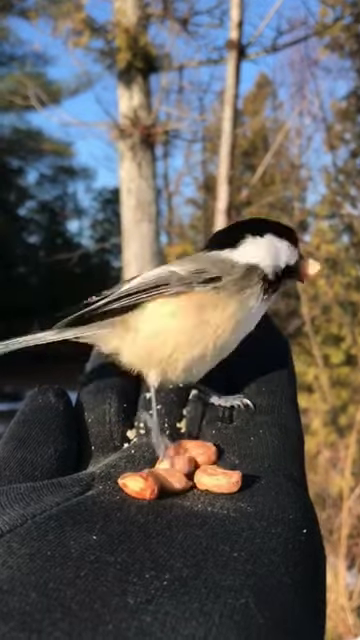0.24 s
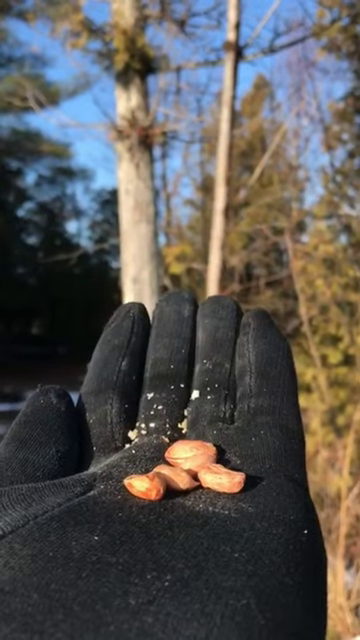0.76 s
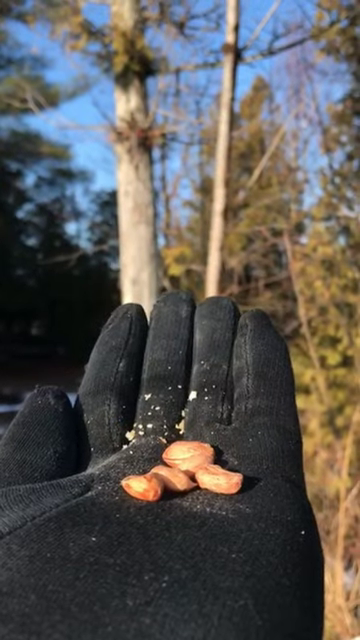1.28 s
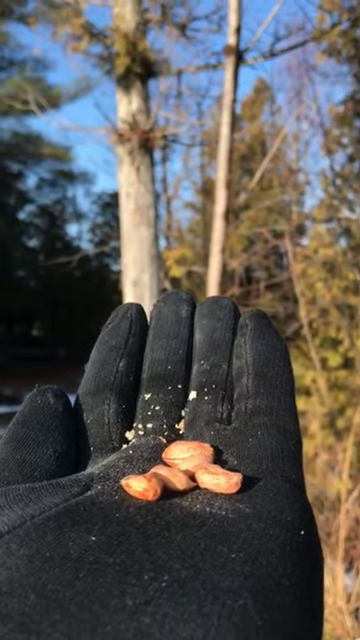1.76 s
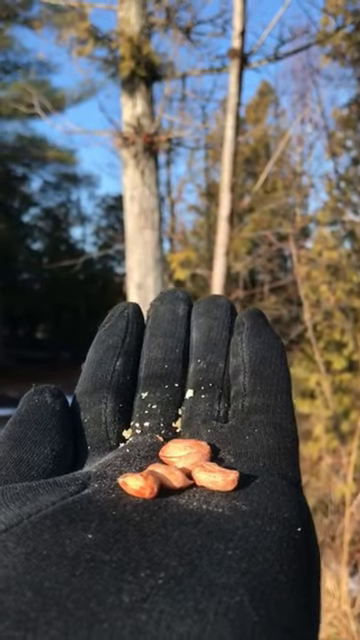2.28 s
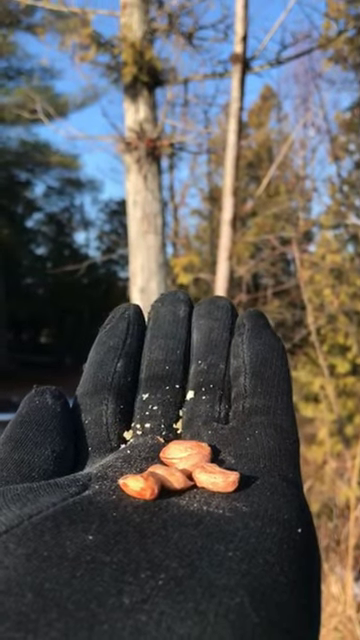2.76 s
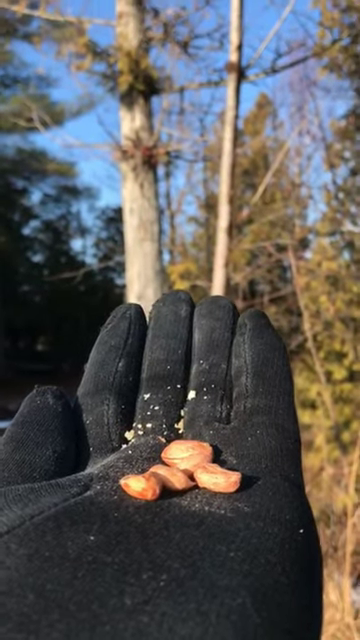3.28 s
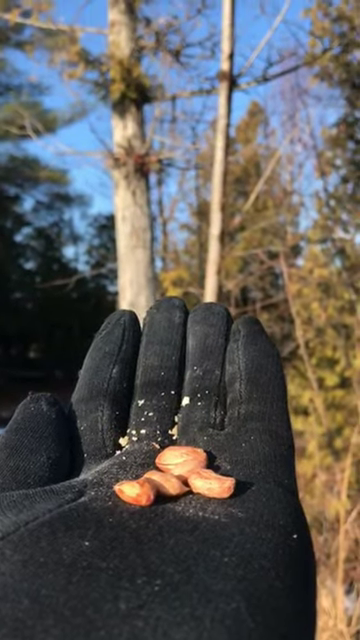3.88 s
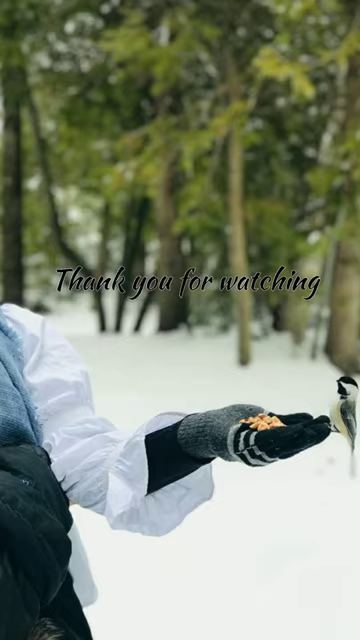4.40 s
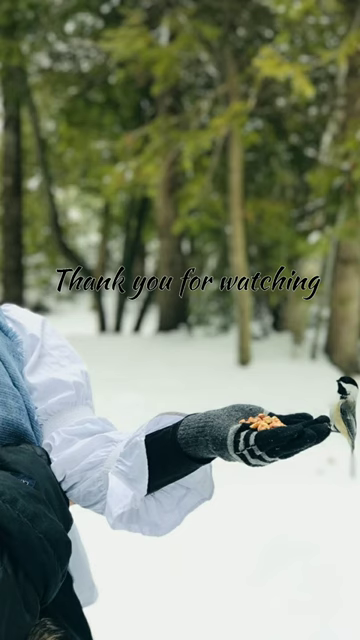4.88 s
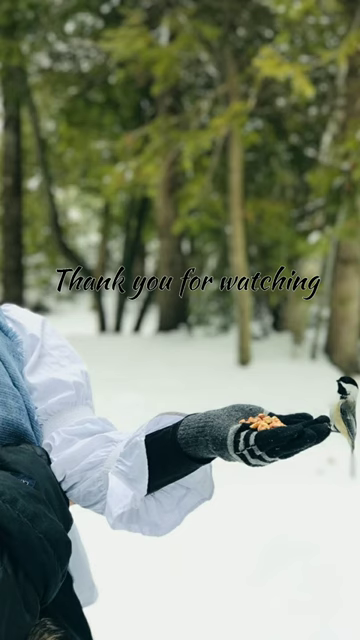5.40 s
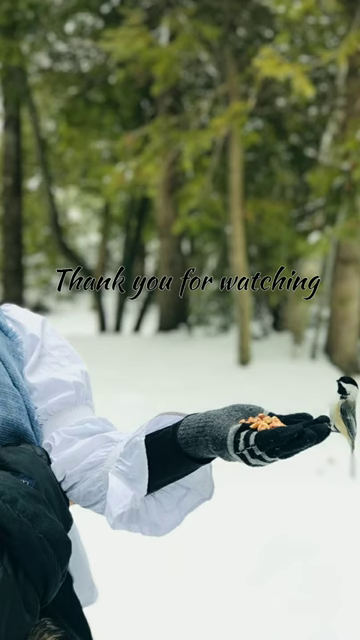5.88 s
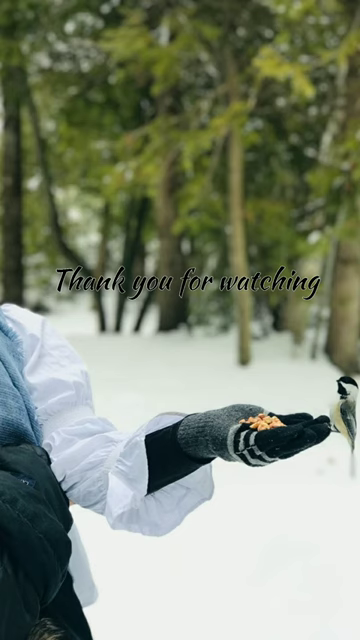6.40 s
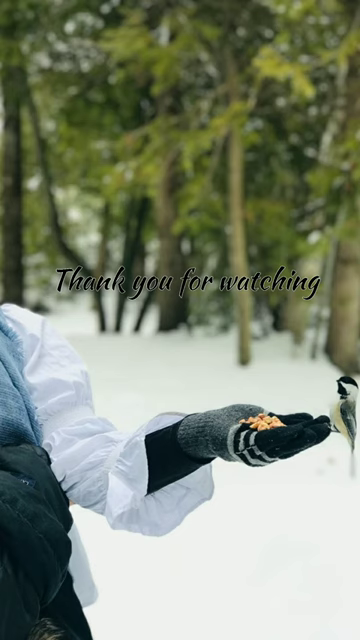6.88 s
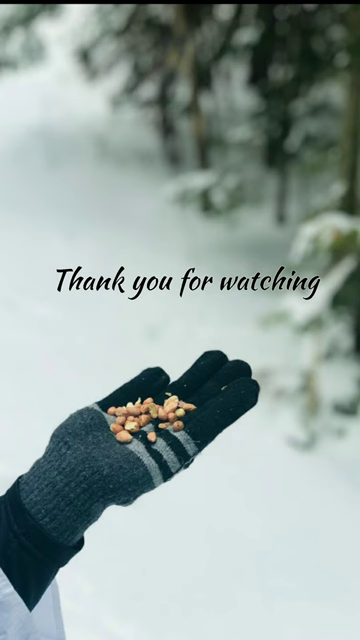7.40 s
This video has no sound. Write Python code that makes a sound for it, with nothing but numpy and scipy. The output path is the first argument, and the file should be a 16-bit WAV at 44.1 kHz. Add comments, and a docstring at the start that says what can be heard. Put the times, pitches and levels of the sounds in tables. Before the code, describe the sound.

From 0 s, low wind rumbles on a stereo microphone outdoors, over faint tree rustle, fine hiss and a distant flickering murmur of small birds. A tiny tap comes at 0.24 s. Around 0.5 s feathers flick and a small bird takes off close by: seven soft, rapid wing thumps, about 25 a second, with a dry whirr fading by 0.85 s. A tiny trill and chirp overlap it. A crisp high chip at 1.25 s, then a near warble at 1.7 s, slightly left. A wind thud and knock come at 2.0-2.1 s, while a soft repeated note runs to 2.55 s. Thin descending glides cluster at 3.1-3.5 s; a sharp click at 3.7 s. Hoarse chatter at 4.5 s, a clear chirp at 5.15 s. From 5.2 s wind buffets grow and rustling rises; hoarse calls at 6.2 s, a dull tap at 6.36 s, then chirps and a buzz until the end at about 7.6 s.

```python
"""Chickadee at a winter wood's edge

A chickadee takes a nut from a gloved hand and whirs away: its wings are air pulses and feather noise.
Small birds call all round in frequency-modulated tones: rising two-voiced chirps, thin gliding tones,
buzzes, a warble, a hooked chip and hoarse harmonic stacks, scattered by the trunks as decaying grains.
Shaped noise makes trees, far flock and wind, which freshens; a few light taps ring as decaying sines."""
import sys
import numpy as np
from scipy import signal
from scipy.fft import rfft, irfft, next_fast_len
from scipy.io import wavfile
from scipy.ndimage import uniform_filter1d, map_coordinates

SR = 44100
rng = np.random.default_rng(int(sys.argv[2]) if len(sys.argv) > 2 else 0)


def to_wav(sig):
    """Store sig (one row per channel, or 1-D mono) as 16-bit WAV at the path in sys.argv[1].

    Samples outside -1..1 are clipped; the rate is SR.
    """
    pcm = np.clip(np.atleast_2d(sig), -1, 1) * 32767
    pcm = np.round(pcm).astype(np.int16)
    wavfile.write(sys.argv[1], SR, pcm.T)  # frames by channels


N = 337365
T = np.arange(N) / SR

# Level columns and settings apply before envelopes, scatter and any gain named in the code.
# Spectrum tables give relative density; noise() scales the result to rms 1.


def undb(db):
    """Logarithmic level: 20 decibels are a factor of ten in amplitude."""
    return 10 ** (np.asarray(db) / 20)


def unit(x):
    """Mean-square normalisation: scale to rms 1."""
    return x / np.sqrt(np.mean(x ** 2) + 1e-20)


def add(out, start_s, x):
    """Superposition: sum x into out from start_s, cut at both ends of the scene."""
    i = int(round(start_s * SR))
    first, last = max(i, 0), min(i + x.shape[-1], N)
    out[..., first:last] += x[..., first - i:last - i]


def noise(spectrum, size=N):
    """Spectral shaping: white noise filtered to (frequency_hz, relative_density_db), rms 1."""
    hz, db = np.transpose(spectrum)
    n = next_fast_len(size)
    f = np.maximum(np.fft.rfftfreq(n, 1 / SR), 1)
    gain = undb(np.interp(np.log(f), np.log(hz), db))
    white = rng.standard_normal(n)
    return unit(irfft(rfft(white) * gain, n)[:size])


def wide(spectrum, side_db):
    """Partial coherence: common noise plus opposite-signed side noise at a given level."""
    middle = noise(spectrum)
    side = noise(spectrum) * np.array([[1], [-1]])
    return unit(middle + undb(side_db) * side)


def walk(rate_hz, size=N):
    """Slow random modulation: random values, rate_hz a second, joined by a smooth curve."""
    at = np.arange(size) / SR * rate_hz
    values = rng.standard_normal(int(at[-1]) + 2)
    return map_coordinates(values, [at], order=2, mode="nearest")


def progress(length_s):
    """Normalised time: 0 to 1 over a note."""
    return np.linspace(0, 1, max(int(length_s * SR), 16))


def swell(u, edge):
    """Amplitude envelope: sine onset and release, each a share of the note."""
    return np.sin(np.pi / 2 * np.clip(np.minimum(u, 1 - u) / edge, 0, 1))


def ports(pan_db):
    """Level-difference panning: left and right gains pan_db apart."""
    return undb(np.array([[pan_db], [-pan_db]]) / 2)


def wood(x, wet_db, t60, pan_db=0):
    """Multiple scattering: direct sound plus sparse decaying echoes from trunks, unlike at each port."""
    t = np.arange(int(.9 * SR)) / SR
    scatter = rng.standard_normal((2, len(t))) * (rng.random((2, len(t))) < .05)
    # builds up over milliseconds, then falls 60 dB in t60 seconds
    scatter = scatter * undb(-60 * t / t60) * (1 - np.exp(-t / 0.0087))
    scatter /= np.sqrt(np.sum(scatter ** 2, axis=1, keepdims=True))
    mono = np.atleast_2d(x).mean(axis=0, keepdims=True)
    echoes = signal.fftconvolve(mono, scatter, axes=1)[:, :N]
    return x * ports(pan_db) + undb(wet_db) * echoes


def syrinx(hz, waver, flicker_db):
    """Frequency and amplitude modulation: a near sine whose pitch and loudness tremble."""
    phase = 2 * np.pi * np.cumsum(hz * (1 + waver * walk(376.0, size=len(hz)))) / SR
    return unit(np.sin(phase) * undb(flicker_db * walk(137, size=len(hz))))


def slur(u, first_hz, middle_hz, last_hz):
    """Frequency glide: a parabola of pitch through three points."""
    return np.polyval(np.polyfit([0, .5, 1], [first_hz, middle_hz, last_hz], 2), u)


def thin_tone(hz, db):
    """Frequency-modulated tone: one trembling near sine along a pitch line."""
    u = np.linspace(0, 1, len(hz))
    return undb(db) * swell(u, edge=0.15) * syrinx(hz, waver=0.013, flicker_db=4.0)


def near_note(start_s, hz, db):
    """Frequency-modulated tone with crisp edges, from a bird close by."""
    out = np.zeros(N)
    u = np.linspace(0, 1, len(hz))
    add(out, start_s, undb(db) * swell(u, edge=.028) * syrinx(hz, waver=.016, flicker_db=2.5))
    return out


# air in the trees, rising as the breeze freshens: time_s, rustle_db, hiss_db
AIR_LEVELS = [(0, -62, -70), (4.5, -61, -69.5), (6.1, -56.5, -65), (7.65, -56.5, -63.9)]
# spectrum of the rush of the trees: frequency_hz, relative_density_db
TREE_SPECTRUM = [(120, 5), (250, 5), (400, 3), (700, 0), (1200, -5), (2200, -12), (3000, -16), (4200, -17),
                 (7000, -21), (12000, -44)]
# spectrum of the fine hiss: frequency_hz, relative_density_db
HISS_SPECTRUM = [(1000, -8), (3000, -7), (6500, 1.5), (8000, 4.5), (11000, 4.5), (15500, 2.5)]


def air():
    """Broadband turbulence noise: soft rush of the trees over a fine even hiss."""
    time_s, rustle_db, hiss_db = np.transpose(AIR_LEVELS)
    rustle = wide(TREE_SPECTRUM, side_db=-4) * undb(np.interp(T, time_s, rustle_db) + 5.0 + .5 * walk(9))
    hiss = wide(HISS_SPECTRUM, side_db=-14) * undb(np.interp(T, time_s, hiss_db) + 2.5)
    return rustle + hiss


# distant chatter of the flock: time_s, level_db
FLOCK_LEVELS = [(0, -71), (1.6, -78), (1.9, -65), (2.9, -79), (3.5, -65.5), (4.3, -74), (4.9, -68),
                (5.7, -73), (6.7, -66.5), (7.65, -70)]
# spectrum of the blurred calls: frequency_hz, relative_density_db
CHATTER_SPECTRUM = [(1500, -27), (1900, 2.5), (2200, 0), (2800, -5), (3500, -1), (4400, -4), (5200, -34)]


def flock():
    """Incoherent summation: many far calls blur into a flickering noise murmur."""
    level_db = np.interp(T, *np.transpose(FLOCK_LEVELS)) + 1.5 * walk(22)
    return wide(CHATTER_SPECTRUM, side_db=0) * undb(level_db)


# spectrum of the higher flutter of wind: frequency_hz, relative_density_db
SMALL_EDDY_SPECTRUM = [(10, -50), (70, -27), (110, 0.5), (160, 4.5), (200, -7), (330, -31), (1500, -90)]
SMALL_EDDY_DB, FRESH_DB, FRESH_S = -59, 10, 6.04  # calm level; step up as the breeze freshens; its time


def small_eddies():
    """Small-scale turbulence: a higher flutter at the ports that steps up as the breeze freshens."""
    fresh = T > FRESH_S
    return wide(SMALL_EDDY_SPECTRUM, side_db=0) * undb(SMALL_EDDY_DB + FRESH_DB * fresh + 2.0 * walk(12))


# wind on the microphone, calm with one lull, then freshening in gusts: time_s, level_db
GUST_LEVELS = [(0, -37.5), (.3, -40), (.4, -50.5), (.47, -41), (.95, -40.5), (1.1, -42.5), (2.0, -43),
               (2.6, -43.5), (3.1, -39.5), (3.5, -43), (5.18, -41.5), (5.26, -34.5), (5.6, -39),
               (5.84, -33), (5.92, -38.5), (6.45, -35), (7.1, -33.5), (7.65, -37.5)]
# spectrum of the wind rumble: frequency_hz, relative_density_db
RUMBLE_SPECTRUM = [(15, -6), (30, -10.5), (40, 0), (47, 3.5), (62, -6.5), (80, -4), (100, -9), (120, -17.5),
                   (155, -15), (200, -26.5), (300, -35.5), (600, -74), (3000, -87)]
# sudden low buffets: start_s, length_s, centre_hz, level_db, left_minus_right_db, left_port_lag_s
WIND_BUFFETS = [(0.635, 0.067, 47.2, -37.5, 1, 0), (1.984, .048, 76, -24, -5, .004),
                (2.03, .046, 78.5, -31, -4, .003), (2.062, .045, 84, -33, -2, .004),
                (2.095, .04, 125, -36, 2, .002), (3.976, 0.097, 52, -37, 2, 0),
                (5.231, .03, 72.4, -28, -4, .005), (5.53, .07, 43.5, -31, 3, .002),
                (5.792, .058, 55, -27, -2, .002), (6.32, 0.045, 112, -41.5, 4, 0),
                (7.027, .052, 75, -22.5, -4, .004), (7.472, .05, 68, -29, -2, .006)]
WIND_DB, EDDY_DB, EDDY_HZ = 1.53, 1.9, 9  # offset to the gusts; depth and rate of random surging


def wind():
    """Turbulent pressure at each port: gusts set the strength of eddies, and vortices throw low thuds."""
    eddies = wide(RUMBLE_SPECTRUM, side_db=-1.93)
    # dividing by the short-time rms leaves the gust curve to set the level
    strength = np.sqrt(uniform_filter1d(np.mean(eddies ** 2, axis=0), int(.1 * SR)))
    gust = undb(np.interp(T, *np.transpose(GUST_LEVELS)) + WIND_DB + EDDY_DB * walk(EDDY_HZ))
    out = ports(pan_db=1.75) * gust * eddies / strength
    for start_s, length_s, centre_hz, level_db, pan_db, lag_s in WIND_BUFFETS:
        u = progress(length_s)
        # a passing vortex swings the pressure unevenly; the left port may lag
        hz = centre_hz * (1 + 0.16 * walk(85.0, size=len(u)))
        swing = np.sin(2 * np.pi * np.cumsum(hz) / SR)
        left, right = undb(level_db) * ports(pan_db) * unit(swing * swell(u, edge=.5))
        add(out[0], start_s + lag_s, left)
        add(out[1], start_s, right)
    return out


# hoarse far calls: start_s, length_s, pitch_hz, throat_resonance_hz, level_db, roughness_share_of_pitch
HOARSE_CALLS = [(3.342, 0.18, 490, 2280, -69, .06), (4.457, 0.03, 630, 1900, -65, .02),
                (4.506, 0.035, 645, 2050, -63.5, .015), (4.54, 0.027, 535, 2250, -62, .03),
                (4.562, .059, 822, 2330, -56.5, .03), (4.617, .035, 650, 2000, -63, .03),
                (6.133, 0.032, 606, 1880, -58.5, .015), (6.172, .045, 695, 3450, -64, .015),
                (6.191, .03, 543, 2120, -56, .025), (6.226, .124, 490.5, 1990, -56.5, .06),
                (6.469, .037, 478, 2400, -70, .04), (6.847, .14, 454, 2350, -70, .04)]
RASP_PULSE_HZ = 32  # rounded to whole pulses in each call
RASP_ARCH, RASP_THROB_DB = .09, -4.5  # pitch (share) and level sink by these between pulses
THROAT_WIDTH_HZ, BEAK_HZ, BEAK_DB = 240, 3300, -16  # half-width of both resonances; weaker beak resonance


def resonance(hz, centre_hz):
    """Resonance curve: gain falls 3 dB at THROAT_WIDTH_HZ from the centre."""
    return 1 / np.hypot(1, (hz - centre_hz) / THROAT_WIDTH_HZ)


def hoarse_calls():
    """Source and filter: harmonics arch in even pulses, coloured by throat and beak resonances."""
    out = np.zeros(N)
    for start_s, length_s, pitch_hz, throat_hz, level_db, rough in HOARSE_CALLS:
        u = progress(length_s)
        pulses = max(round(length_s * RASP_PULSE_HZ), 1)
        dip = np.cos(np.pi * pulses * u) ** 2
        pitch = pitch_hz * (1 - RASP_ARCH * dip + rough * walk(260.4, size=len(u)))
        phase = 2 * np.pi * np.cumsum(pitch) / SR
        stack = np.zeros(len(u))
        # from the second harmonic up to about 3900 Hz
        for k in range(2, int(3900 / pitch_hz) + 1):
            colour = resonance(k * pitch, throat_hz) + undb(BEAK_DB) * resonance(k * pitch, BEAK_HZ)
            stack += np.sin(k * phase) * colour
        throb_db = RASP_THROB_DB * dip + 2.0 * walk(152, size=len(u))
        add(out, start_s, undb(level_db) * swell(u, edge=0.1) * unit(stack * undb(throb_db)))
    return out


# buzzy slurs: start_s, length_s, first_hz, middle_hz, last_hz, level_db, flutter_hz, flutter_depth_hz
BUZZ_NOTES = [(1.857, 0.11, 2300, 3270, 3560, -75, 27, 300), (4.545, .08, 6200, 6650, 6900, -69, 90, 500),
              (5.449, 0.15, 3810, 3590, 3500, -73, 70, 410),
              (7.385, .17, 4020, 3685, 3620, -60.5, 75.3, 300)]
BUZZ_THROB_DB = 4.5  # level swings this far up and down in each pulse


def buzzes():
    """Periodic modulation: slurs broken into fast, even pulses, each a tiny downward sweep."""
    out = np.zeros(N)
    for start_s, length_s, first_hz, middle_hz, last_hz, level_db, flutter_hz, depth_hz in BUZZ_NOTES:
        u = progress(length_s)
        cycle = flutter_hz * length_s * u % 1
        hz = slur(u, first_hz, middle_hz, last_hz) + depth_hz * (1 - 2 * cycle)
        throb_db = -BUZZ_THROB_DB * np.cos(2 * np.pi * cycle)
        tone = unit(undb(throb_db) * syrinx(hz, waver=.015, flicker_db=1.2))
        add(out, start_s, swell(u, edge=.1) * undb(level_db) * tone)
    return out


# thin gliding tones; the first three overlap as one two-voiced chirp:
# start_s, length_s, first_hz, middle_hz, last_hz, level_db, left_minus_right_db
GLIDING_TONES = [(1.498, .045, 4750, 6250, 6750, -64, 0), (1.51, .044, 4600, 5400, 5950, -61, 0),
                 (1.542, .02, 7150, 7300, 7200, -64, 0), (1.693, .026, 2900, 3330, 4030, -64.5, 5),
                 (1.706, 0.025, 3850, 4380, 4970, -63, 7), (3.148, .04, 7400, 7130, 6800, -64.5, -7),
                 (3.179, 0.074, 6880, 6340, 5530, -63.5, -13), (3.255, 0.052, 6950, 6900, 6830, -62, -2),
                 (3.338, 0.068, 6800, 6170, 5250, -60.5, -12), (3.451, 0.053, 2450, 2395, 2390, -70, 2),
                 (3.475, 0.039, 6050, 5780, 5160, -62.5, -9), (3.7, 0.045, 2700, 3100, 3530, -68, 0),
                 (3.755, 0.044, 3120, 3260, 3400, -65.5, -2), (3.838, 0.037, 4000, 4210, 4320, -63.5, -2),
                 (3.885, 0.077, 5150, 5180, 5140, -68, -2), (4.25, .08, 2170, 2230, 2160, -69, -7),
                 (6.628, 0.053, 2500, 2680, 2540, -65.5, -7), (6.91, 0.075, 7950, 7500, 7100, -70, 0),
                 (6.969, 0.046, 3310, 3150, 3080, -59, 0), (7.109, .085, 2720, 2290, 2200, -62.5, -8),
                 (7.516, 0.074, 2560, 2380, 2280, -64, -5)]


def gliding_tones():
    """Frequency glides: thin tones placed by level difference; the first three form a two-voiced chirp."""
    out = np.zeros((2, N))
    for start_s, length_s, first_hz, middle_hz, last_hz, level_db, pan_db in GLIDING_TONES:
        hz = slur(progress(length_s), first_hz, middle_hz, last_hz)
        add(out, start_s, ports(pan_db) * thin_tone(hz, level_db))
    return out


# two-voiced chirps: start_s, length_s, low_voice_top_hz, high_voice_top_hz, low_voice_db, high_voice_db
CHIRP_NOTES = [(-.025, 0.085, 5700, 7060, -59, -60.5), (0.58, .1, 5700, 6920, -56.5, -57.5),
               (1.774, .11, 5850, 7100, -63, -62.5), (2.122, 0.071, 5350, 6470, -64, -62.5),
               (2.185, 0.089, 5640, 7100, -60.5, -64), (2.676, .08, 5750, 7200, -65, -72),
               (3.075, 0.073, 6010, 6850, -62, -62), (3.196, 0.063, 5500, 6800, -58, -62),
               (4.01, 0.11, 5820, 7050, -63, -58), (4.22, 0.074, 5850, 6730, -63.5, -63),
               (4.637, 0.12, 5890, 6960, -56.5, -56), (5.154, 0.13, 5860, 6970, -53, -52.5),
               (5.778, .115, 5690, 7150, -57, -55), (6.027, .07, 6000, 6910, -64, -57.5),
               (6.444, 0.065, 5960, 6700, -60, -61), (6.627, .055, 5650, 6250, -59, -62.5),
               (6.714, 0.09, 5800, 7100, -56.5, -54), (7.208, .105, 5750, 6950, -51, -56),
               (7.56, 0.097, 5680, 7100, -54.5, -52)]
CHIRP_SWEEP = .41  # depth of the low voice's sweep (share of pitch)
CHIRP_STEP, CHIRP_STEP_AT = .045, .6  # high voice's step up (share of pitch), done at this share of the note


def chirps():
    """Two-source phonation: both sides of the syrinx sweep up, growing louder; the high voice steps up."""
    out = np.zeros(N)
    for start_s, length_s, low_hz, high_hz, low_db, high_db in CHIRP_NOTES:
        u = progress(length_s)
        off_top = np.abs(1 - u / .86) ** 2.5  # pitch and level top out near the end
        step = 1 - CHIRP_STEP * np.clip((CHIRP_STEP_AT - u) * 20, 0, 1)
        low_pitch = low_hz * (1 - CHIRP_SWEEP * off_top)
        high_pitch = high_hz * step * (1 - 0.27 * off_top)
        low = syrinx(low_pitch, waver=.018 + .045 * off_top, flicker_db=2.5)
        high = syrinx(high_pitch, waver=0.015 + 0.013 * off_top, flicker_db=3.0)
        both = undb(low_db - 7 * off_top) * low + undb(high_db - 19 * off_top) * high
        add(out, start_s, both * swell(u, edge=0.19))
    return out


# runs of one repeated arched note: start_s, end_s, repeat_s, note_length_s, top_hz, arch_depth_hz,
# top_at_share_of_note, level_db, fade_db_per_s, scatter_db
NOTE_RUNS = [(.636, .72, .0245, .022, 4620, 2400, .32, -60.5, 15, -6),
             (2.128, 2.56, .124, .034, 3680, 560, .75, -67, 3, 1)]
ARCH_FALL_DB = -14  # sets how a note softens away from its top


def runs():
    """Periodic repetition: one arched note repeats evenly and fades; the farther bird has more scatter."""
    out = np.zeros((2, N))
    for start_s, end_s, repeat_s, length_s, top_hz, arch_hz, top_at, level_db, fade, wet_db in NOTE_RUNS:
        off_top = progress(length_s) - top_at
        hz = top_hz - arch_hz * np.sin(np.pi / 2 * off_top) ** 2
        notes = np.zeros(N)
        for s in np.arange(start_s, end_s, repeat_s):
            add(notes, s, thin_tone(hz, level_db - fade * (s - start_s) + ARCH_FALL_DB * off_top ** 2))
        out += wood(notes, wet_db=wet_db, t60=0.4)
    return out


# one near warble; WARBLE_S is the start of the swoop up, which reaches the first crest WARBLE_RISE_S later
WARBLE_S, WARBLE_RISE_S, WARBLE_HOLD_S, SCALLOP_S = 1.711, .031, .072, .0237
WARBLE_FROM_HZ, CREST_HZ, SCALLOP_HZ, WARBLE_SAG_HZ_PER_S = 2100, 4600, 818, 2150  # crests sag in turn
WARBLE_DB, WARBLE_ONSET_DB, CREST_DB = -53, -15, -5  # onset and crests are softer by these
WARBLE_FADE_DB = -6  # reached at the very end


def warble():
    """Cyclic frequency modulation: a swoop up into scallops of pitch, loudest in the troughs."""
    t = np.arange(-WARBLE_RISE_S, WARBLE_HOLD_S, 1 / SR)
    below = 1 - np.minimum(1 + t / WARBLE_RISE_S, 1) ** 2
    held = np.maximum(t, 0)
    trough = np.abs(np.sin(np.pi * held / SCALLOP_S)) ** 0.59
    swoop_hz = CREST_HZ + (WARBLE_FROM_HZ - CREST_HZ) * below
    hz = swoop_hz - SCALLOP_HZ * trough - WARBLE_SAG_HZ_PER_S * held
    db = WARBLE_DB + WARBLE_ONSET_DB * below ** 2 + CREST_DB * (1 - trough) * (1 - below)
    return near_note(WARBLE_S, hz, db + WARBLE_FADE_DB * (held / WARBLE_HOLD_S) ** 5)


# one near hooked chip: it climbs and grows, then plunges
CHIP_S, CHIP_RISE_S, CHIP_DROP_S = 1.249, .032, .011
CHIP_FROM_HZ, CHIP_TOP_HZ, CHIP_END_HZ = 7160, 8060, 5000
CHIP_DB, CHIP_ONSET_DB, CHIP_END_DB = -49.5, -16, -17  # the two ends are softer by these


def chip():
    """Frequency glide: a thin note levels off at its loudest and ends in a downward hook."""
    t = np.arange(-CHIP_RISE_S, CHIP_DROP_S, 1 / SR)
    before, after = np.maximum(-t / CHIP_RISE_S, 0), np.maximum(t / CHIP_DROP_S, 0)
    climb_hz = (CHIP_FROM_HZ - CHIP_TOP_HZ) * before ** 2
    plunge_hz = (CHIP_END_HZ - CHIP_TOP_HZ) * after ** 2
    db = CHIP_DB + CHIP_ONSET_DB * before + CHIP_END_DB * after
    return near_note(CHIP_S, CHIP_TOP_HZ + climb_hz + plunge_hz, db)


# four close taps, one row for each ring: start_s, level_db, ring_hz, decay_60_db_s
TAP_RINGS = [(.242, -44, 5200, 0.0029), (2.0982, -31.5, 1530, 0.0045), (2.0995, -33.5, 820, .012),
             (2.099, -32.5, 370, 0.015), (3.6818, -27, 9500, 0.0013), (3.6826, -26.5, 2420, 0.0021),
             (3.6823, -28, 1040, 0.0038), (3.683, -33, 5700, 0.0022), (6.36, -21.5, 260, 0.015),
             (6.36, -29.5, 690, 0.0074)]


def taps():
    """Damped modes: small knocks near the microphone ring briefly as decaying sines."""
    out = np.zeros(N)
    t = np.arange(SR // 20) / SR
    for start_s, level_db, ring_hz, t60 in TAP_RINGS:
        onset = 1 - np.exp(-t * ring_hz * 3)
        add(out, start_s, undb(level_db - 60 * t / t60) * np.sin(2 * np.pi * ring_hz * t) * onset)
    return out


# flicks of the wing feathers: start_s, length_s, level_db, crisp_top_db
FEATHER_FLICKS = [(.471, .015, -68, -62), (0.492, 0.011, -54, -70), (.503, .014, -55, -57),
                  (.517, .02, -58, -70), (0.543, .018, -54.5, -64), (0.581, 0.017, -57.5, -58),
                  (.622, .022, -59, -68), (0.7, .01, -62, -63), (0.776, .014, -64, -62)]
# spectrum of a flick's body: frequency_hz, relative_density_db
FLICK_BODY_SPECTRUM = [(300, -9), (900, 1.5), (2300, 1.5), (3500, -7), (6000, -14), (12000, -30)]
# spectrum of a flick's crisp top: frequency_hz, relative_density_db
FLICK_TOP_SPECTRUM = [(1500, -20), (4000, 1), (7500, 0), (11500, -2), (13000, -20)]


def flicks():
    """Friction noise: soft, broad whisks as the wings open and brush past each other."""
    out = np.zeros(N)
    for start_s, length_s, level_db, top_db in FEATHER_FLICKS:
        u = progress(length_s)
        body = undb(level_db) * noise(FLICK_BODY_SPECTRUM, size=len(u))
        top = undb(top_db) * noise(FLICK_TOP_SPECTRUM, size=len(u))
        add(out, start_s, (body + top) * swell(u, edge=0.7))
    return out


def feathers(size):
    """Friction noise: dry, gritty swish of vanes sliding over each other."""
    swish = noise([(200, -10), (600, 6), (1300, 0.5), (2400, 1), (3800, -4), (6000, -8),
                   (11000, -10.5), (13000, -24)], size=size)  # frequency_hz, relative_density_db
    return unit(swish * undb(2.5 * walk(500, size=size)))


# take-off: even wingbeats that fade as the bird leaves
TAKEOFF_S, WINGBEAT_S, SPREAD_DB_PER_S = .5425, .0395, 112  # first full stroke, period, whirr's growth before it
PUSH_DB, SWISH_DB, WHIRR_DB = -36, -59, -58
PUSH_FADE_DB_PER_S, FEATHER_FADE_DB_PER_S = 63, 34


def wings(count):
    """Periodic air pulses: each stroke pushes a short wave and brushes feathers, over a fading whirr."""
    flown = T - TAKEOFF_S
    whirr_db = WHIRR_DB + np.minimum(SPREAD_DB_PER_S * flown, -FEATHER_FADE_DB_PER_S * flown)
    out = feathers(N) * undb(whirr_db)
    t = np.arange(-SR // 25, SR // 25) / SR
    push = np.sin(2 * np.pi * 250 * t) * np.exp(-(t / 0.0042) ** 2)
    brush = np.exp(-((t - .003) / .007) ** 2)
    for age in WINGBEAT_S * np.arange(count):
        thump = undb(PUSH_DB - PUSH_FADE_DB_PER_S * age) * push
        swish = undb(SWISH_DB - FEATHER_FADE_DB_PER_S * age) * brush * feathers(len(t))
        add(out, TAKEOFF_S + age + t[0], thump + swish)
    return out


def scene():
    """Superposition: air and wind, far and near birds in the wood, taps and wings."""
    background = air() + flock() + small_eddies() + wind()
    far = wood(hoarse_calls(), wet_db=-1, t60=.4, pan_db=1) * undb(-3.2)
    far += wood(buzzes(), wet_db=-1, t60=.4, pan_db=-5)
    far += wood(gliding_tones(), wet_db=.5, t60=.48) * undb(-2.9)
    far += wood(chirps(), wet_db=3, t60=.45, pan_db=.5) * undb(-8.5)
    near = wood(warble(), wet_db=-13, t60=.4, pan_db=6.5)
    near += wood(chip(), wet_db=-6, t60=.32)
    return background + far + runs() + near + taps() + flicks() + wings(count=7)


MONO_HZ, TOP_HZ = 7600, 15900  # stereo narrows above the first; sound is cut above the second


def record(dry):
    """Mid-side filtering: the pair narrows to mono in the high treble; a low-pass cuts the very top."""
    narrowing = signal.butter(10, MONO_HZ, fs=SR, output="sos")
    side = signal.sosfiltfilt(narrowing, (dry[0] - dry[1]) / 2)
    pair = dry.mean(axis=0) + side * np.array([[1], [-1]])
    return signal.sosfilt(signal.ellip(10, .2, 70, TOP_HZ, fs=SR, output="sos"), pair)


dry = scene()
out = record(dry)
to_wav(out)
```